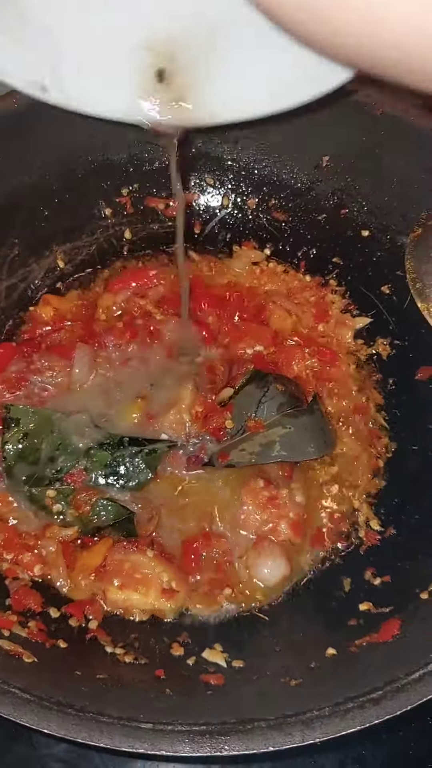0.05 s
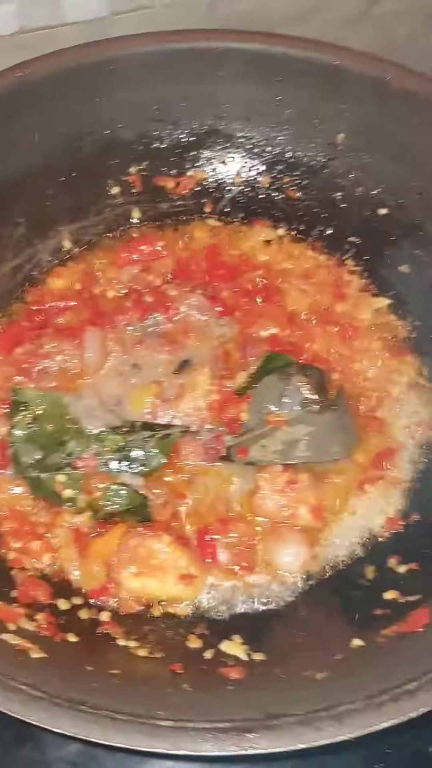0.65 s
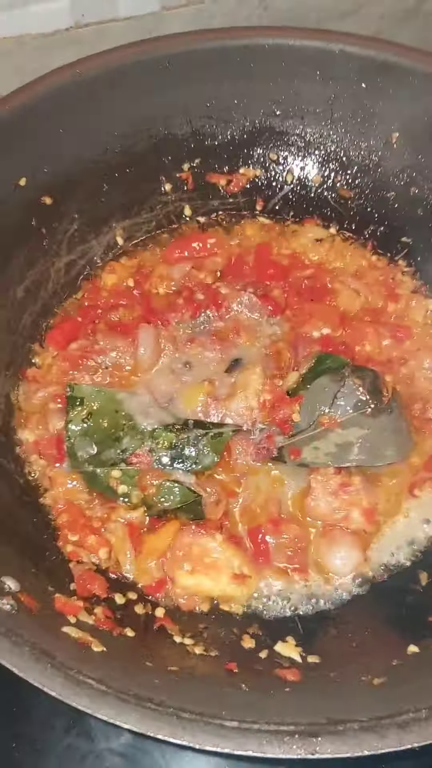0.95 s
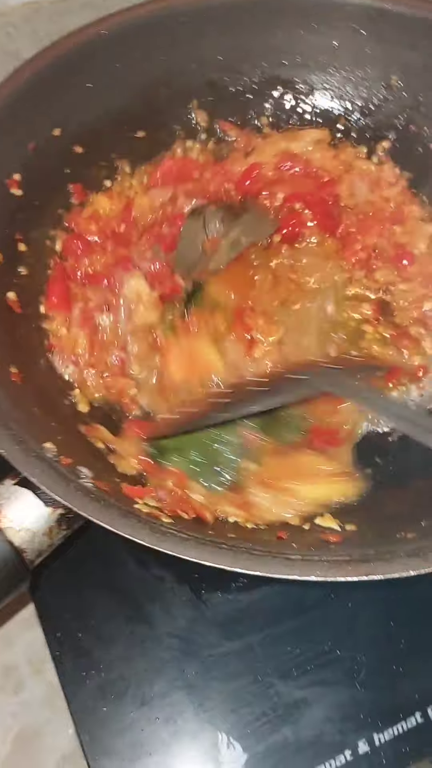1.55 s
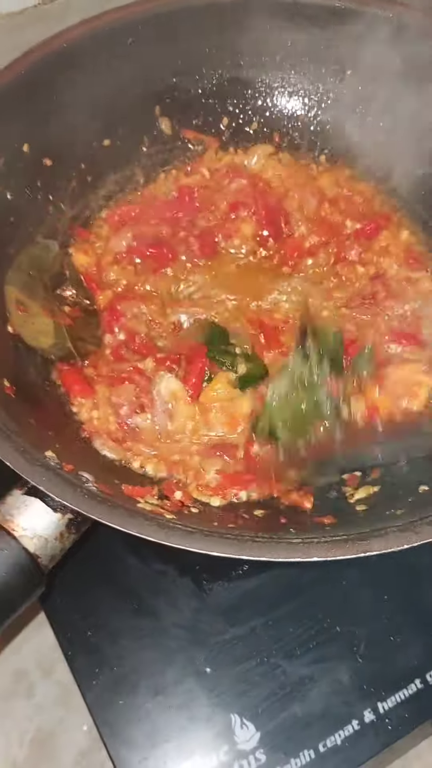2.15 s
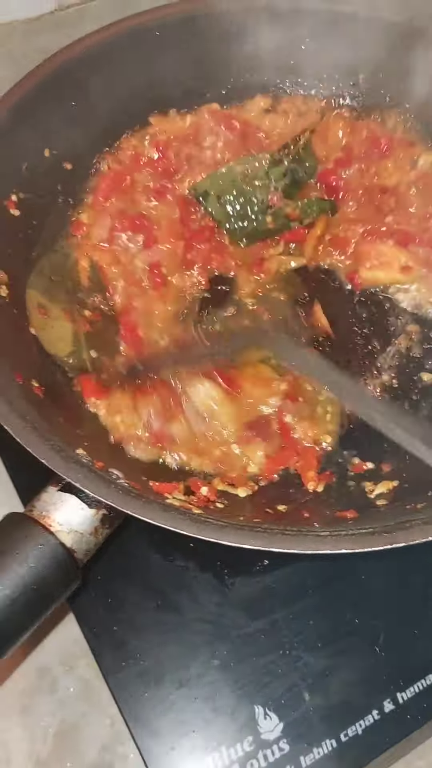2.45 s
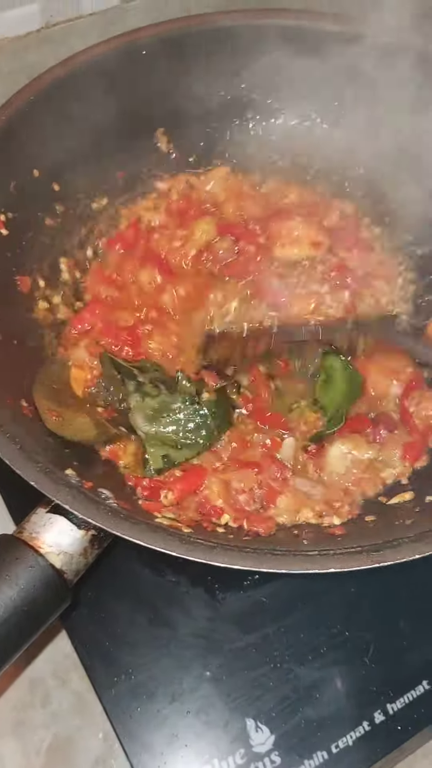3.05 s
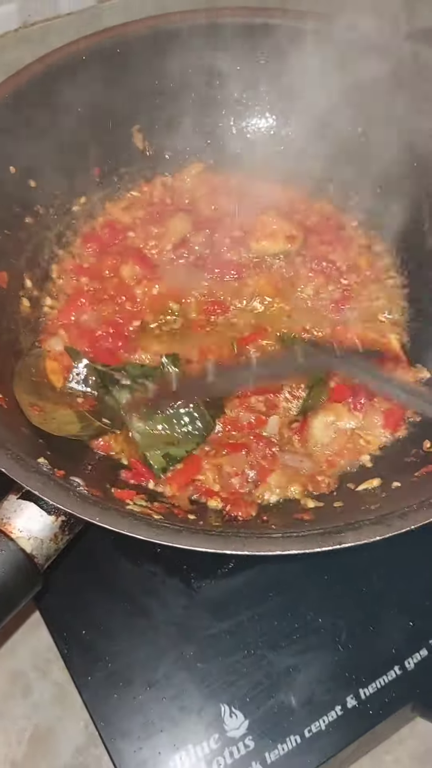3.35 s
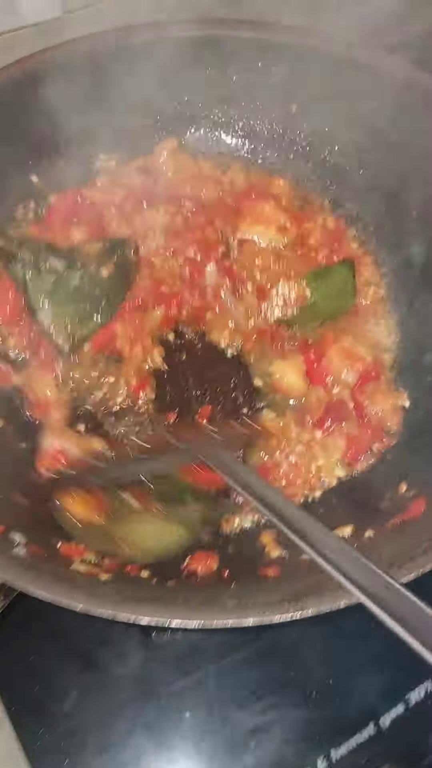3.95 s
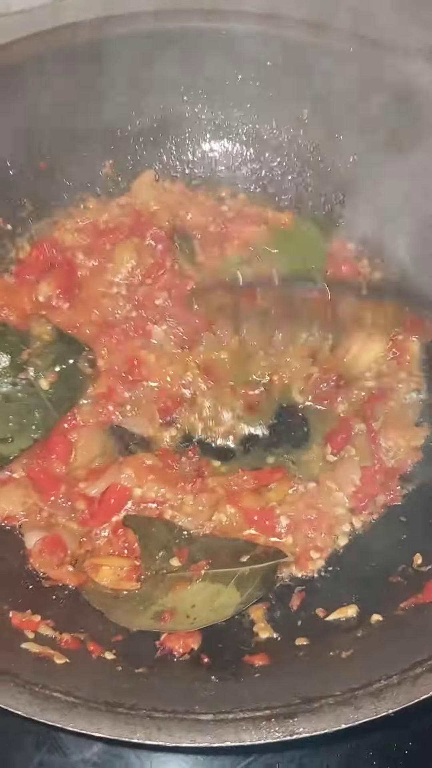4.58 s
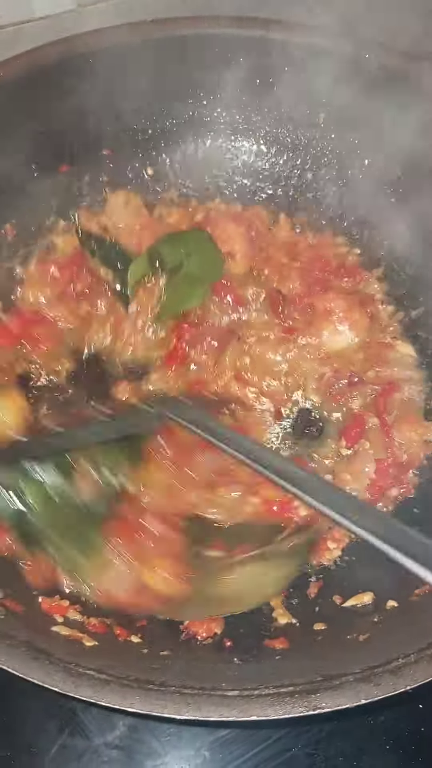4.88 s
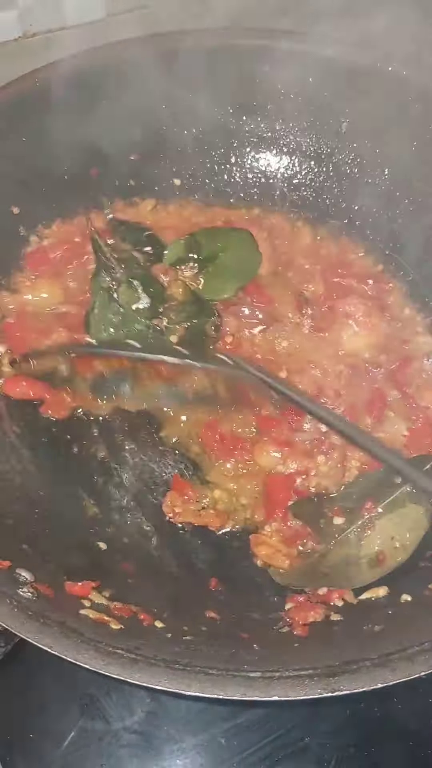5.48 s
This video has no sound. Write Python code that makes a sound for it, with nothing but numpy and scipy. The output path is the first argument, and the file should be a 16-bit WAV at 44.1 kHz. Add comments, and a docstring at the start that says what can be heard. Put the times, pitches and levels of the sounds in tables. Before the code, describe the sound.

For the first 0.6 seconds a thinning trickle of liquid gurgles and seethes in a hot wok, with one sharp spit of oil. A tiny dip in level marks an abrupt change to chili paste frying, a dense bubbling with a bright fizz that continues throughout. From about 1 second a metal spatula stirs, squelching through the paste, scraping bare metal and landing with soft, hollow knocks. The sizzle swells with the strokes, notably around 1.5, 1.9, 2.5, 4.3 and 4.7 seconds. Oil spits a few more times between 1.6 and 2.7 seconds. The stirring is lighter from 3 to 4 seconds, then knocks and scrapes pick up again. At about 5.2 seconds one hard clank leaves the wok ringing softly, followed by short groans of the dragging blade. A low stove rumble and faint electric hum run underneath. Everything is close, with slight small-kitchen echo.

```python
"""Chopped chili sizzles in a wok in a small kitchen, as its water boils out in countless tiny bubbles.
First a trickle of liquid seethes in the oil; an edit cuts from the pouring to the frying, with a brief
dip in level. Then a spatula stirs: each stroke turns wet paste onto hot metal and the sizzle swells.
The blade rubs, scrapes, knocks and groans on the pan, and one hard clank leaves the wok ringing.
Now and then a drop of oil spits. Underneath are the low rumble of the stove and a faint electric hum."""
import sys
import numpy as np
from scipy import signal
from scipy.fft import rfft, irfft, next_fast_len
from scipy.io import wavfile

SR = 44100
rng = np.random.default_rng(int(sys.argv[2]) if len(sys.argv) > 2 else 0)


def int16_out(signal):
    """Quantize to a 16-bit WAV file."""
    q = np.round(np.clip(np.atleast_2d(signal).T, -1, 1) * 32767)
    wavfile.write(sys.argv[1], SR, q.astype(np.int16))


N = 243431
TIME = np.arange(N) / SR
CUT_S = 0.628  # an edit cuts from the pouring to the frying


def amp(db):
    """Turn decibels into a number to multiply by."""
    return 10 ** (np.asarray(db) / 20)


def level(x, db):
    """Set the average (rms) level of a sound."""
    return x * amp(db) / np.sqrt(np.mean(x ** 2))


def unit(response):
    """Scale a filter so that white noise keeps its power."""
    return response / np.sqrt(np.sum(response ** 2, axis=-1, keepdims=True))


def fade(start, t60):
    """Jump to 1, then die away; t60 is the fade time, the seconds it takes to drop 60 dB."""
    return (TIME >= start) * np.exp(-np.log(1000) * np.maximum(TIME - start, 0) / t60)


def hold(end, t60):
    """Stay at 1 until the end time, then die away."""
    return (TIME < end) + fade(end, t60)


def ramp(start, length):
    """A smooth step from 0 to 1."""
    return np.sin(np.pi / 2 * np.clip((TIME - start) / length, 0, 1))


def slide(start, length, first_hz, last_hz):
    """A strength that swells and eases, and a pitch that moves steadily."""
    progress = np.clip((TIME - start) / length, 0, 1)
    return np.sqrt(np.abs(np.sin(np.pi * progress))), first_hz + (last_hz - first_hz) * progress


def wander(per_s):
    """A smooth random drift, about 1 in size."""
    return level(signal.sosfilt(signal.butter(2, per_s, fs=SR, output="sos"), rng.standard_normal(N)), 0)


def convolve(x, response):
    """Let every sample of a sound set off a copy of the response."""
    return signal.fftconvolve(np.atleast_2d(x), np.atleast_2d(response), axes=1)[:, :N]


def colour(x, spectrum, size=4096):
    """Shape the tone along a curve of (frequency [Hz], level [dB]) points."""
    hz, db = np.transpose(spectrum)
    bins = np.maximum(np.arange(size // 2 + 1) * SR / size, 1)
    gain = amp(np.interp(np.log(bins), np.log(hz), db))
    cepstrum = irfft(np.log(gain))
    cepstrum[1:size // 2] *= 2  # folded so the filter rings only after a sound, never before
    cepstrum[size // 2 + 1:] = 0
    return convolve(x, irfft(np.exp(rfft(cepstrum))))


def high_pass(x, hz):
    """Take away the bass."""
    return signal.sosfilt(signal.butter(2, hz, "high", fs=SR, output="sos"), x)


def resonate(x, hz, width_hz):
    """Keep the band around one pitch."""
    return signal.lfilter(*signal.iirpeak(hz, hz / width_hz, SR), x)


def glide(x, hz, width_hz):
    """Keep the band around a moving pitch."""
    turn = np.exp(2j * np.pi * np.cumsum(hz) / SR)
    return (signal.lfilter(*signal.butter(2, width_hz / 2, fs=SR), x / turn) * turn).real


def ring(start, tones, rise_s=0.0023):
    """The tones of struck metal build up during the contact, then fade."""
    age = TIME - start
    rise = 1 - np.exp(-np.maximum(age, 0) / rise_s)
    return rise * sum(amp(db) * fade(start, t60) * np.sin(2 * np.pi * hz * age) for hz, db, t60 in tones)


def from_pan(x, lag_s=0.0002):
    """The pan is nearer the left side, so the right hears it later."""
    x = np.ravel(x)
    return np.array([x, np.interp(TIME - np.round(lag_s * SR) / SR, TIME, x)])


def pops(per_s, spread_db, busy=1, lag_s=0.00018, lag_spread_s=0.0001):
    """Clicks all over the pan, many small and few large; busier is smoother, not louder."""
    when, strength, sign, place, angle, chance = rng.random((int(per_s * N / SR), 6)).T
    share = (busy * np.ones(N))[(when * N).astype(int)]
    size = np.sign(sign - 0.5) * amp(-spread_db * np.log(np.maximum(strength, 0.002)))
    size = size * (chance < share) / np.sqrt(share)
    scatter = np.sqrt(-2 * np.log(1 - place)) * np.cos(2 * np.pi * angle)  # a bell curve
    right_lag = lag_s + lag_spread_s * scatter
    return np.array([np.bincount((when * N + d * SR).astype(int) % N, size, N) for d in (0, right_lag)])


# Spatula strokes: (start [s], length [s], fizz [dB], bubbling [dB], fizz fade time [s],
# rubbing [dB], rocking of the wok [dB])
SPATULA_STROKES = [(0.979, 0.535, -42, -37, 2.5, -46.5, -57.5), (1.423, 0.16, -27.5, -31.5, 3.6, -47, -51),
                   (1.701, 0.147, -34, -37, 0.89, -45.5, -62), (1.876, 0.133, -27, -40.5, 4.4, -69, -68),
                   (2.412, 0.1575, -26, -33.5, 2.68, -51, -66),
                   (2.593, 0.184, -40, -41, 1.03, -47.5, -70.5),
                   (2.839, 0.23, -29.5, -37.5, 2.61, -67, -56), (3.825, 0.11, -32, -36, 3.2, -53, -79),
                   (4.217, 0.17, -29.5, -33.5, 4, -50, -75), (4.698, 0.1676, -27, -38, 1.42, -54, -57),
                   (5.187, 0.108, -55, -63, 0.73, -58.5, -61.5)]


def boiling(rest_bubbling_db=-37.5, rest_fizz_db=-33.5, linger=2.09):
    """Bubbling and fizz levels: each stroke spreads wet paste on hot metal, where it boils dry."""
    bubbling_power, fizz_power = amp(rest_bubbling_db) ** 2, amp(rest_fizz_db) ** 2
    for start, length, fizz_db, bubbling_db, t60, *_ in SPATULA_STROKES:
        wetted = ramp(start, length)
        drying_db = 20 * np.log10(np.maximum(hold(start + length, t60), 1e-12))
        bubbling_power += (wetted * amp(bubbling_db + drying_db / linger)) ** 2  # outlasts the fizz
        fizz_power += (wetted * amp(fizz_db + drying_db)) ** 2
    return 10 * np.log10(bubbling_power), 10 * np.log10(fizz_power)


# The tone of the coarse bubbles: (frequency [Hz], level [dB])
BUBBLING_TONE = [(40, -29.5), (200, -26), (550, -17), (800, -11), (1020, -9), (1200, -5), (1500, -3),
                 (1780, -4), (2050, 0), (3000, 1.9), (3900, 0.18), (5000, 0.5), (6500, -6), (9000, -16.5)]
# The tone of the fine fizz: (frequency [Hz], level [dB])
FIZZ_TONE = [(100, -80), (3000, -32.5), (5500, -6.5), (7000, -4.5), (8100, 0), (9200, -2.5), (10300, -1.5),
             (11500, 2.5), (12500, 2.5), (14000, 0), (15500, -1.5)]


def sizzle(pour_fizz_db=-34):
    """Water boils out of the paste in coarse bubbles, and fizzes where it meets bare hot metal."""
    bubbling_db, fizz_db = boiling()
    fizz_db = np.where(TIME < CUT_S, pour_fizz_db, fizz_db)
    busy = amp(fizz_db - fizz_db.max())
    coarse = pops(per_s=26000, spread_db=2.5, busy=busy, lag_s=0.0001806, lag_spread_s=0.00008)
    bubbling = in_bowl(coarse, BUBBLING_TONE, bowl_db=-16.5) * amp(bubbling_db + 4.5)
    fine = pops(per_s=50000, spread_db=2, busy=busy)
    fizz = level(colour(fine, FIZZ_TONE), 3.47) * amp(fizz_db)
    return bubbling * (TIME >= CUT_S) + fizz


def shifting_food(x, drift_db=0.85, per_s=9, bands=11):
    """As the food moves, each band from low to high swells and sinks on its own."""
    size = next_fast_len(N)
    spectrum = rfft(x, size)
    hz = np.arange(size // 2 + 1) * SR / size
    place = np.interp(np.log(hz + 1), np.log([700, 15000]), [0, bands - 1])
    out = np.zeros((2, N))
    for k in range(bands):
        band = irfft(spectrum * np.maximum(1 - np.abs(place - k), 0), size)[:, :N]
        out += band * amp(drift_db * wander(per_s))
    return out


# The tone of liquid boiling in oil: (frequency [Hz], level [dB])
SEETHE_TONE = [(30, -22), (55, -6), (100, -6), (150, -3.5), (215, -19), (300, -1.5), (385, -13.5),
               (450, -4.5), (650, -6.5), (790, -0.5), (1000, -4.5), (1800, -0.5), (2200, 1.5), (3800, 1.5),
               (4800, 2.5), (6500, -2), (9500, -9)]


def trickle(gain_db=-28, thinning_db_per_s=12, gurgle_hz=170):
    """Poured liquid seethes in the oil; its small bubbles ring higher as they shrink."""
    seethe = amp(0.54) * in_bowl(pops(per_s=10000, spread_db=3), SEETHE_TONE, bowl_db=-16)
    stream = amp(-thinning_db_per_s * TIME)  # the low gurgle fades as the stream thins
    seethe = stream * seethe + (1 - stream) * high_pass(seethe, gurgle_hz)
    swell, hz = slide(0, length=0.72, first_hz=2760, last_hz=2900)
    bubbles = level(glide(pops(per_s=900, spread_db=1.5), hz, width_hz=700), -3)
    flicker = amp(1.5 * wander(per_s=33))
    return (seethe + bubbles * swell * flicker) * amp(gain_db) * (TIME < CUT_S)


# The notes that bubbles wake in the bowl: (pitch [Hz], width [Hz], level [dB])
BOWL_NOTES = [(312, 55, -4), (626, 73, -8.5), (802.5, 10, 9.5), (1237, 46, 1), (1352.5, 79, 0.5),
              (1798.5, 260, 2.5)]


def in_bowl(bubbles, tone, bowl_db):
    """Bubbles are heard directly, and also make the bowl ring softly."""
    ringing = sum(amp(db) * resonate(bubbles, hz, width) for hz, width, db in BOWL_NOTES)
    return level(colour(bubbles, tone), 0) + level(ringing, bowl_db)


# The tone of the stove's rumble: (frequency [Hz], level [dB])
STOVE_TONE = [(20, -28), (40, -30), (60, -14.5), (110, -7), (160, 6), (215, -13.5), (300, 8), (450, -1),
              (900, 15), (3000, -42)]
# The notes of the electric hum: (pitch [Hz], level [dB])
HUM_NOTES = [(100, -74.5), (150, -69.5)]


def stove_and_hum():
    """The stove rumbles steadily over a faint electric hum."""
    rumble = from_pan(rng.standard_normal(N)) + amp(-2) * rng.standard_normal((2, N))
    hum = sum(amp(db) * np.sqrt(2) * np.sin(2 * np.pi * hz * TIME) for hz, db in HUM_NOTES)
    return level(colour(rumble, STOVE_TONE), -49.5) + hum


# Single drops of oil spitting: (time [s], relative level [dB])
OIL_SPITS = [(0.2617, -7), (1.584, -19), (1.7187, -11.5), (2.097, -21.5), (2.504, -22), (2.686, -7)]


def spits(t60=0.0056):
    """Larger drops burst with a sharp snap."""
    snap = level(resonate(rng.standard_normal((2, N)), hz=6960, width_hz=21000), -5.5)
    return snap * sum(amp(db) * fade(start, t60) for start, db in OIL_SPITS)


def pushing(drag_start_s=0.69, drag_db=-57.5, rest_rock_db=-63, lift_s=0.4):
    """Rubbing and rocking build through each stroke and ease off, over a light steady drag."""
    rub_power = (amp(drag_db) * (TIME >= drag_start_s)) ** 2
    rock_power = amp(rest_rock_db) ** 2
    for start, length, *_, rub_db, rock_db in SPATULA_STROKES:
        force = ramp(start, length / 2) * (1 - ramp(start + length, lift_s))
        rub_power += (force * amp(rub_db)) ** 2
        rock_power += (force * amp(rock_db)) ** 2
    return np.sqrt(rub_power), np.sqrt(rock_power)


# The notes of the wok full of food: (pitch [Hz], width [Hz], level [dB])
FULL_WOK_NOTES = [(321, 27, -2), (461, 53, -7), (538, 62, -7.5), (793, 36, -7), (921.5, 32, -6),
                  (1269, 72, -3)]


def muffled_wok():
    """One tap on the wok, muffled by food: the wider a note, the shorter it rings."""
    tones = [(hz, db + 10 * np.log10(width), np.log(1000) / (np.pi * width))
             for hz, width, db in FULL_WOK_NOTES]
    return high_pass(ring(0, tones), hz=237)  # thin metal gives off little bass


# The tone of squelching paste: (frequency [Hz], level [dB])
SQUELCH_TONE = [(100, -8), (200, 6), (290, -21), (420, 2), (560, 27), (900, -15), (1500, -3), (3000, 7.5),
                (6000, -43)]
# The tone of the wok rocking: (frequency [Hz], level [dB])
ROCKING_TONE = [(20, -37.5), (40, -36), (58, -3), (100, -7.5), (158, 5.5), (210, -14), (400, -17),
                (1000, -46)]


def rubbing(bump_t60=0.257):
    """Tiny slips of the blade squelch the paste and shake the bowl; the wok rocks on the stove."""
    push, rocking = pushing()
    blows = sum(amp(db) * fade(start, bump_t60) for start, db, *_ in BLADE_BUMPS)
    rocking = np.hypot(rocking, amp(-27) * blows)
    force = np.hypot(amp(-0.5) * push, amp(-6.5) * blows)
    slips = level(pops(per_s=3700, spread_db=2), 0) * force
    squelch = colour(signal.unit_impulse(N), SQUELCH_TONE)
    rumble = level(colour(from_pan(rng.standard_normal(N)), ROCKING_TONE), -3.5) * rocking
    return convolve(slips, amp(-6) * unit(squelch) + amp(-1.5) * unit(muffled_wok())) + rumble


# Scrapes on bare metal:
# (start [s], length [s], first pitch [Hz], last pitch [Hz], width [Hz], level [dB])
METAL_SCRAPES = [(1.008, 0.03, 2870, 2610, 4850, -30), (1.044, 0.118, 1490, 1460, 890, -41.5),
                 (1.178, 0.0394, 818, 800, 130, -39), (1.182, 0.028, 585, 566, 110, -46),
                 (1.23, 0.048, 2440, 2240, 480, -31.5), (1.25, 0.058, 1840, 1460, 503, -34.5),
                 (1.294, 0.22, 1910, 1514, 1620, -40.5), (1.489, 0.15, 1280, 1370, 220, -37.5),
                 (1.515, 0.13, 2930, 3230, 1100, -33.5), (1.649, 0.065, 3220, 3300, 600, -32),
                 (1.776, 0.09, 2660, 2130, 1390, -35.5), (1.945, .14, 3170, 3570, 1000, -41.5),
                 (2.85, 1, 1710, 1773, 260, -46.5), (4.116, 0.17, 2520, 2170, 1260, -35),
                 (4.258, 0.096, 835, 770, 200, -41), (4.418, 0.44, 858, 820, 364, -47),
                 (4.588, 0.363, 2214, 2290, 560, -38.5)]


def scraping():
    """The blade sticks and slips on metal; the pitch follows the spot where it touches."""
    slips, out = pops(per_s=9000, spread_db=1.5)[0], np.zeros(N)
    for start, length, first_hz, last_hz, width_hz, db in METAL_SCRAPES:
        pressure, hz = slide(start, length, first_hz, last_hz)
        out += level(pressure * glide(slips, hz, width_hz), db) * np.sqrt(length * SR / N)
    return from_pan(out, lag_s=0.00012)


# Soft bumps of the blade through the paste:
# (time [s], relative level [dB], hollow knock [dB], ring compared with the bump [dB])
BLADE_BUMPS = [(1.013, -43, -58, -23.5), (1.187, -40, -32, -13.5), (1.326, -44.5, -36, -35),
               (1.356, -48, -39, -30), (1.493, -42, -39, -30), (1.814, -42, -35, -30),
               (1.905, -48, -40, -30), (2.171, -43, -42.5, -32), (2.196, -44.5, -40.5, -32),
               (2.616, -31, -34, -23.5), (2.717, -41, -50, -21.5), (2.765, -51.5, -47, -26),
               (3.125, -41, -50, -33.5), (3.485, -46.5, -43, 2.5), (3.725, -49, -52.5, -30),
               (4.123, -36.5, -47, -15.5), (4.174, -31.5, -35.5, -16), (4.255, -38, -44, -25),
               (4.748, -46, -46, -27)]


def bumps(stopped_t60=0.08):
    """The blade bumps the pan, which rings on until the blade lands again."""
    taps, ringing = np.zeros((2, N))
    wok, thud = wok_ring(0), muffled_wok()
    next_landings = [row[0] for row in BLADE_BUMPS[1:]] + [N / SR]
    for (start, db, _, ring_db), lands in zip(BLADE_BUMPS, next_landings):
        at = int(start * SR)
        taps[at] = amp(db)
        ringing[at:] += amp(db + ring_db) * wok[:N - at] * hold(lands, stopped_t60)[at:]
    thuds = amp(6) * convolve(taps, thud / np.abs(thud).max())
    return from_pan(thuds + ringing)


# The notes of the wok ringing freely: (pitch [Hz], level [dB], fade time [s])
FREE_WOK_NOTES = [(420.6, -3.5, 0.97), (804.4, -1.5, 2.3), (774, -8, 1.15), (1190, -7, 0.84),
                  (1605, -15.5, .7)]


def wok_ring(start, flutter_db=3, jitter_hz=7, per_s=35):
    """The wok rings; sliding food makes each note flutter in level and pitch."""
    out = np.zeros(N)
    for hz, db, t60 in FREE_WOK_NOTES:
        pitch = hz + jitter_hz * wander(per_s)
        phase = 2 * np.pi * np.cumsum(pitch * (TIME >= start)) / SR
        out += amp(db + flutter_db * wander(per_s)) * fade(start, t60) * np.sin(phase)
    return out


# The tone of a hollow knock: (frequency [Hz], level [dB])
KNOCK_TONE = [(100, -14), (250, -23.5), (440, 3.5), (550, 9.5), (680, -15), (800, -7), (950, 2.5),
              (1400, -16), (5000, -26.5)]


def knocking(t60=0.12):
    """At each bump the blade lands in the full bowl with a hollow knock."""
    contact = level(colour(rng.standard_normal(N), KNOCK_TONE), 0)
    force = sum(amp(knock_db) * fade(start, t60) for start, _, knock_db, _ in BLADE_BUMPS)
    return from_pan(contact * force)


# Hisses of wet paste: (start [s], length [s], first pitch [Hz], last pitch [Hz], level [dB])
PASTE_HISSES = [(1.456, 0.072, 4930, 4700, -34.5), (1.518, .105, 3700, 4300, -31),
                (1.787, 0.74, 4300, 4640, -36), (4.666, 0.25, 4150, 4670, -33.5)]


def searing(width_hz=1900):
    """Wet paste pressed onto bare hot metal hisses for a moment."""
    bubbles, out = pops(per_s=20000, spread_db=4.5), np.zeros((2, N))
    for start, length, first_hz, last_hz, db in PASTE_HISSES:
        pressure, hz = slide(start, length, first_hz, last_hz)
        out += level(pressure * glide(bubbles, hz, width_hz), db) * np.sqrt(length * SR / N)
    return out


# Groans of the dragging blade: (start [s], length [s], first pitch [Hz], last pitch [Hz], level [dB])
BLADE_GROANS = [(1.645, 0.16, 311.5, 341, -47), (1.817, 0.036, 555, 505, -42),
                (2.698, 0.074, 317, 332, -48), (5.202, 0.045, 425, 437, -43), (5.247, .1, 434, 413, -46.5),
                (5.356, 0.027, 570, 544, -40.5), (5.364, 0.062, 436, 448.6, -43)]


def groaning(jitter=0.022, rough_db=3):
    """The slipping blade locks onto one low note and groans at an unsteady pitch."""
    waver = 1 + jitter * wander(per_s=80.4)
    grip = amp(rough_db * wander(per_s=75))
    out = np.zeros(N)
    for start, length, first_hz, last_hz, db in BLADE_GROANS:
        pressure, hz = slide(start, length, first_hz, last_hz)
        out += amp(db) * pressure * np.sqrt(2) * np.sin(2 * np.pi * np.cumsum(hz * waver) / SR)
    return from_pan(out * grip)


# The hard strike of the blade: (time [s], relative level [dB])
HARD_STRIKES = [(5.1774, -20)]
# The tone of its crack: (frequency [Hz], level [dB])
CRACK_TONE = [(100, -38.5), (280, -2), (700, -9), (1000, -14), (1150, -1), (1380, 0), (1900, -5),
              (2900, 4.5), (4500, -8), (5600, 1), (8000, -8), (11000, -22.5), (15000, -33)]
# The notes of the ringing spatula: (pitch [Hz], level [dB], fade time [s])
BLADE_NOTES = [(2206, 1, 0.19), (2207, -8, 0.1), (2540, -4.5, 0.1), (2890, -13, 0.07), (3240, -3, 0.116),
               (4035, -1, 0.23), (4220, -8, .12), (5600, -12, 0.054), (6060, -17, .1)]


def clank(snap_t60=0.012, rattle_t60=0.14, free_s=0.05, smothered_t60=0.07):
    """A hard strike snaps and rattles; paste soon smothers the blade's ring, but the wok rings on."""
    force, ringing, buzz = np.zeros((3, N))
    for start, db in HARD_STRIKES:
        force += amp(db) * (amp(-2) * fade(start, snap_t60) + amp(-1) * fade(start, rattle_t60))
    crack_response = unit(colour(signal.unit_impulse(N), CRACK_TONE))
    crack = convolve(rng.standard_normal((2, N)) * force, crack_response)
    for start, db in HARD_STRIKES:
        blade = ring(start, BLADE_NOTES) * hold(start + free_s, smothered_t60)
        ringing += amp(db) * (blade + amp(-20) * wok_ring(start))
        buzz += fade(start, t60=0.28)
    chatter = amp(1.5 * wander(per_s=160) * buzz)  # the blade buzzes against the pan
    return crack + from_pan(ringing * chatter, lag_s=0.00007)


def walls(x, t60=0.19, echo_db=-7, dull_hz=2200):
    """The nearby kitchen walls send back a blur of dull echoes, different left and right."""
    tail = unit((rng.standard_normal((2, N)) * fade(0.0021, t60))[:, :SR // 2])
    dull_tail = signal.lfilter(*signal.butter(1, dull_hz, fs=SR), tail)
    return amp(echo_db) * convolve(x, dull_tail)


def scene(dip_s=0.0126, dip_db=-6):
    """The pan, its echoes and the stove; the level dips briefly at the cut from pouring to frying."""
    frying = shifting_food(sizzle() + searing()) + trickle()
    spatula = bumps() + rubbing() + knocking() + scraping() + groaning() + clank()
    pan = frying + spatula + spits()
    dip = amp(dip_db * ((TIME >= CUT_S) & (TIME < CUT_S + dip_s)))
    return (pan + walls(pan) + stove_and_hum()) * dip


# How much louder the phone's left side is than its right: (frequency [Hz], difference [dB])
LEFT_OVER_RIGHT = [(60, 4), (110, 5), (200, 0.5), (330, -2), (700, 6), (1290, 3), (2380, -1.5), (4400, 0.5),
                   (8120, 4), (15000, 5)]


def record(dry, bass_hz=34.8, top_hz=15650):
    """A nearby phone hears each side with its own tone, and cuts the deep bass and the very top."""
    sides = np.vstack([colour(x, [(hz, side * db / 2) for hz, db in LEFT_OVER_RIGHT])
                       for x, side in zip(dry, (1, -1))])
    top_cut = signal.ellip(14, 0.1, 80, top_hz, fs=SR, output="sos")
    return signal.sosfilt(top_cut, high_pass(sides, bass_hz))


dry = scene()
out = record(dry)
int16_out(out)
```